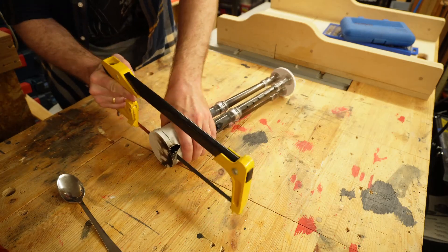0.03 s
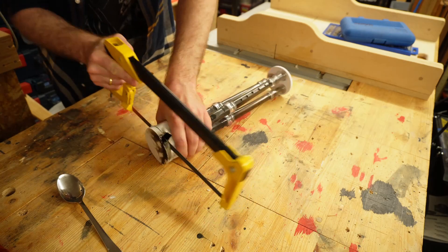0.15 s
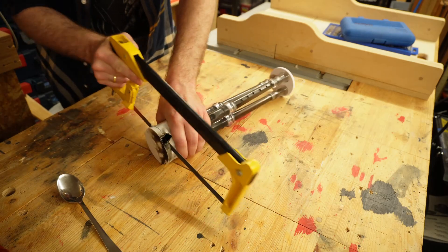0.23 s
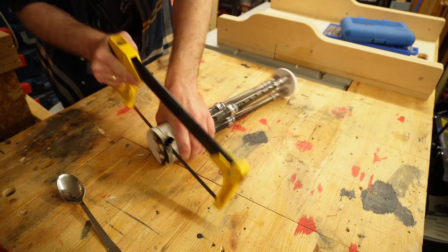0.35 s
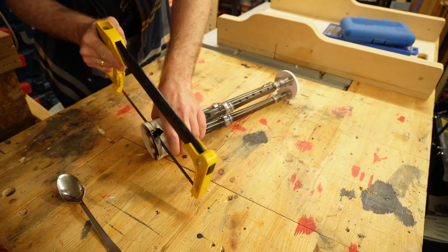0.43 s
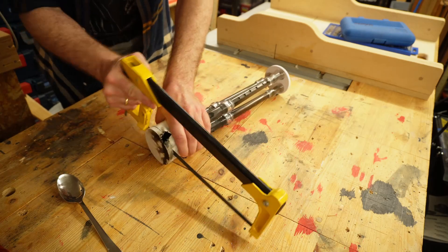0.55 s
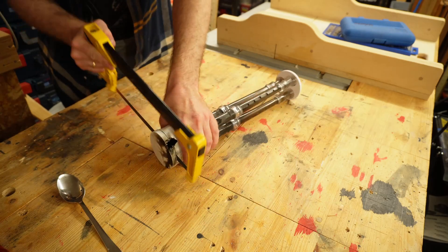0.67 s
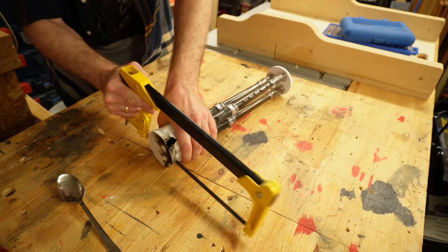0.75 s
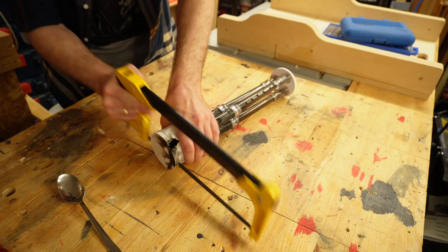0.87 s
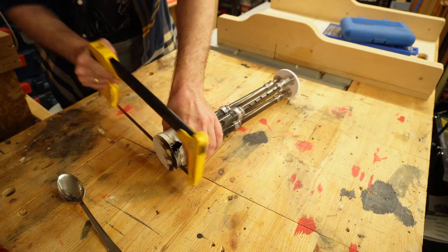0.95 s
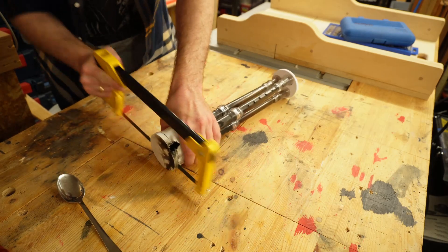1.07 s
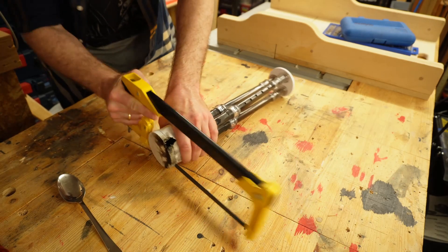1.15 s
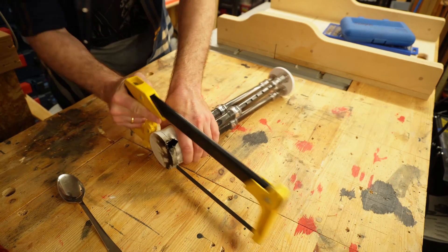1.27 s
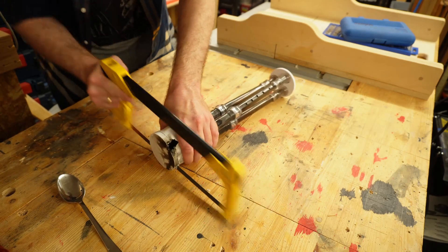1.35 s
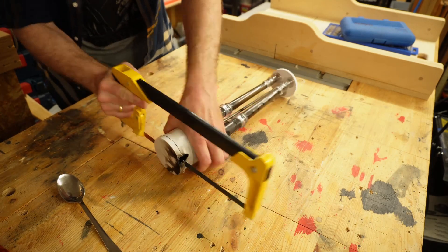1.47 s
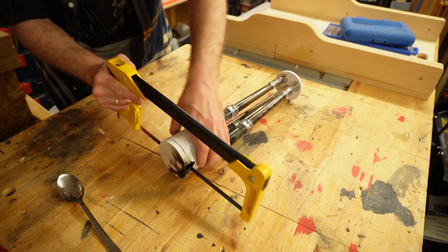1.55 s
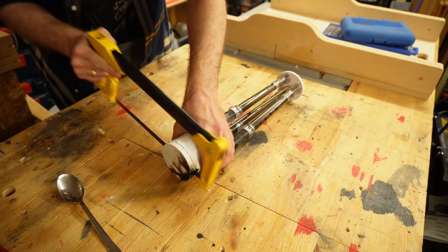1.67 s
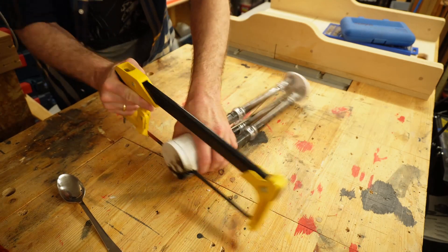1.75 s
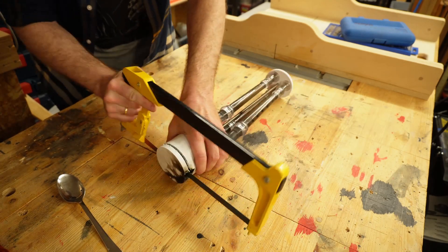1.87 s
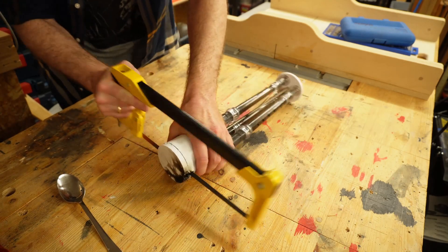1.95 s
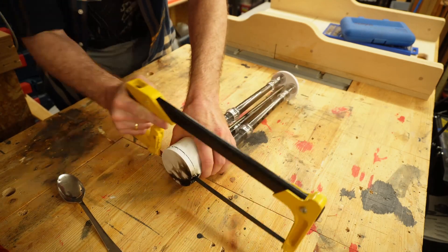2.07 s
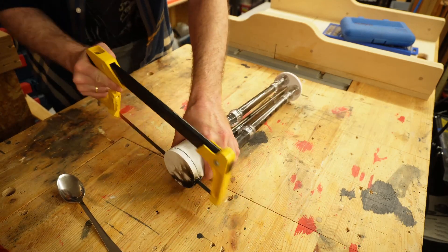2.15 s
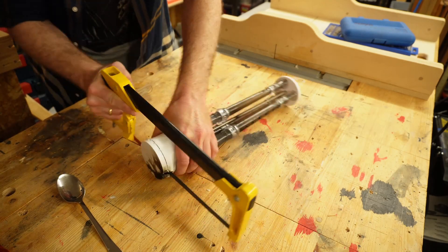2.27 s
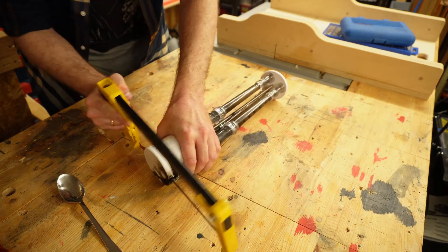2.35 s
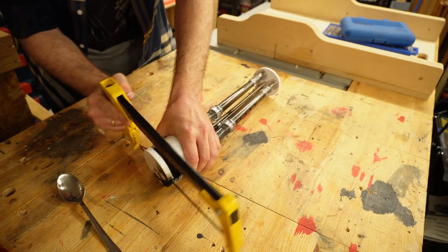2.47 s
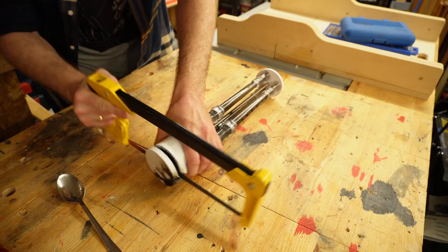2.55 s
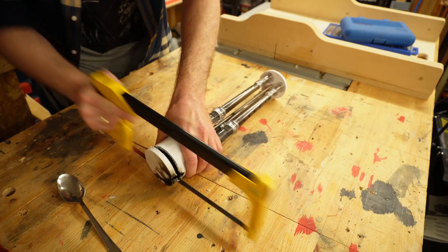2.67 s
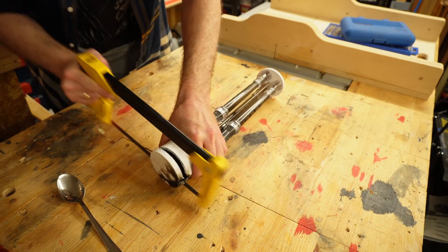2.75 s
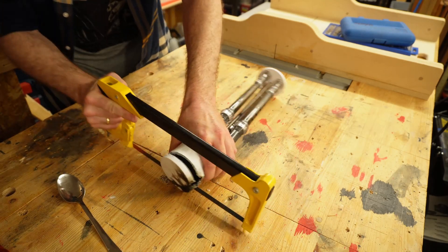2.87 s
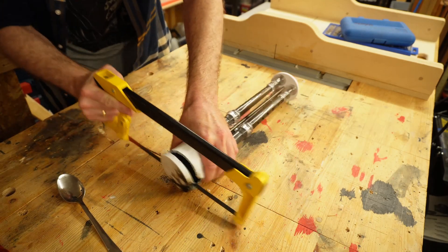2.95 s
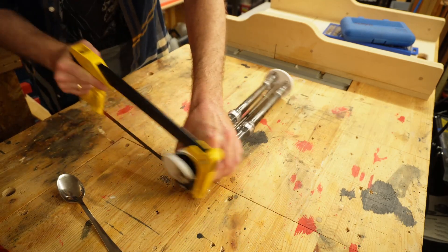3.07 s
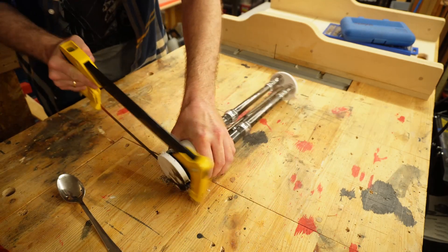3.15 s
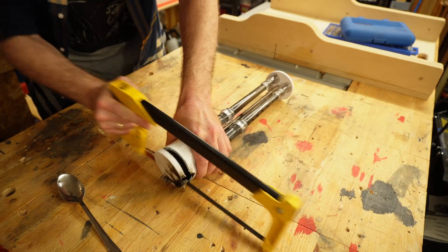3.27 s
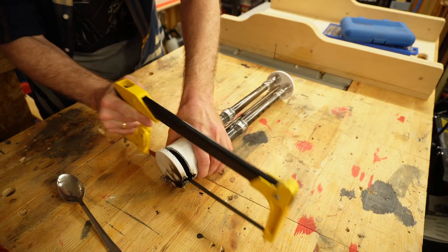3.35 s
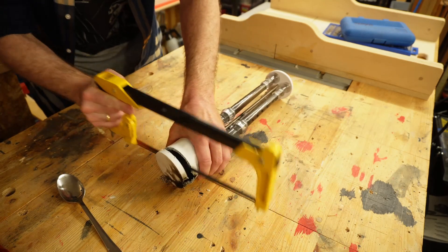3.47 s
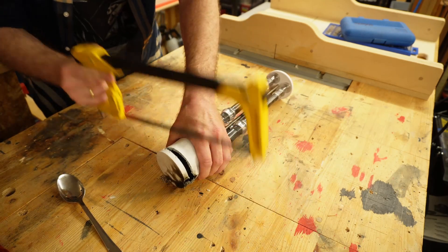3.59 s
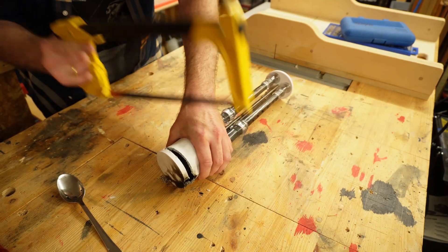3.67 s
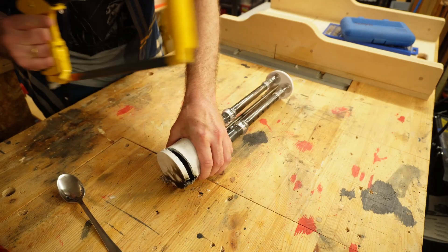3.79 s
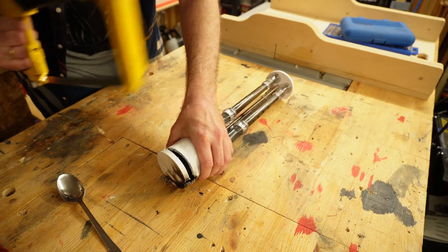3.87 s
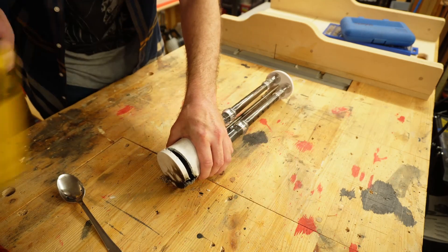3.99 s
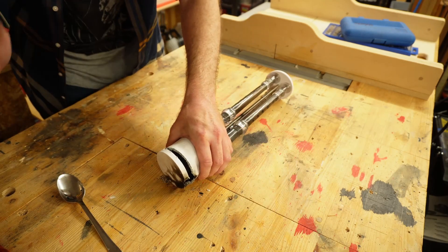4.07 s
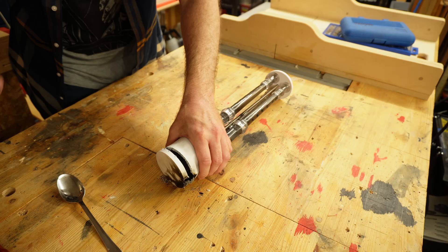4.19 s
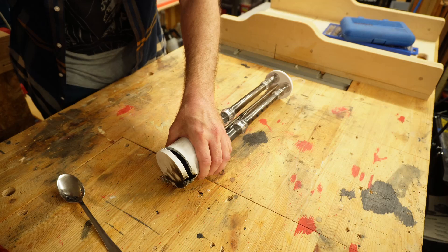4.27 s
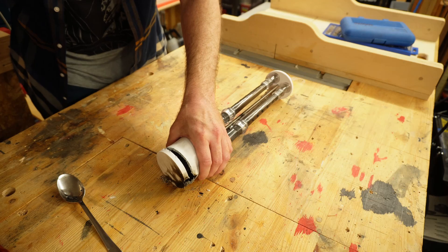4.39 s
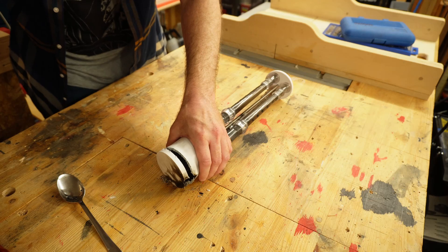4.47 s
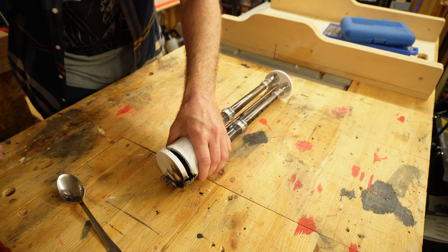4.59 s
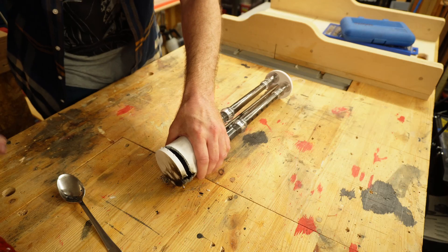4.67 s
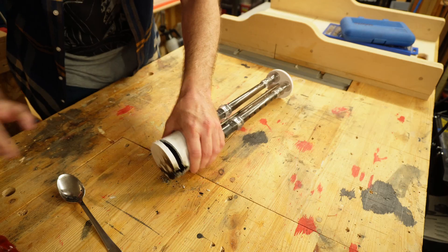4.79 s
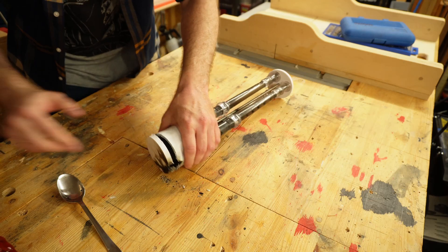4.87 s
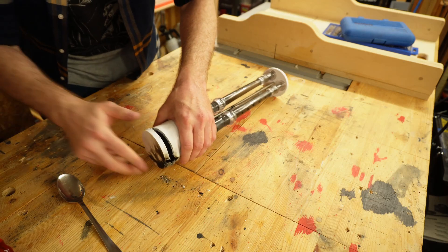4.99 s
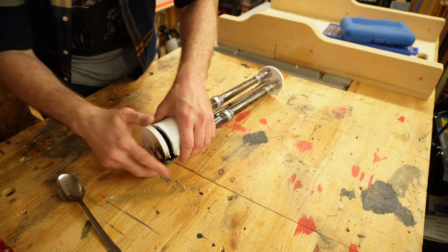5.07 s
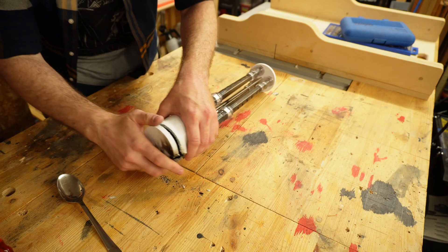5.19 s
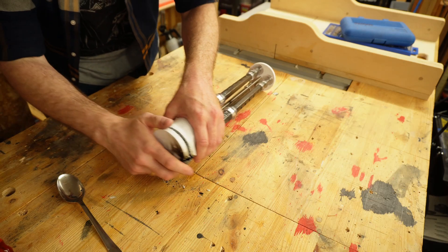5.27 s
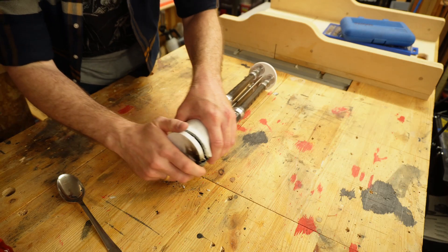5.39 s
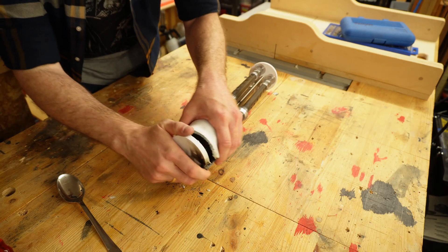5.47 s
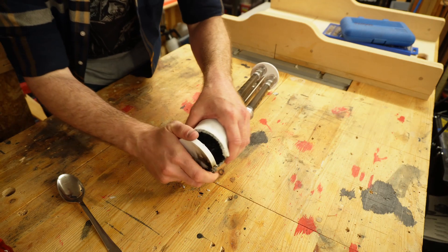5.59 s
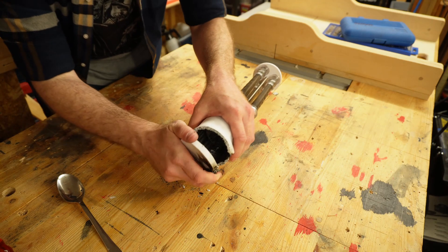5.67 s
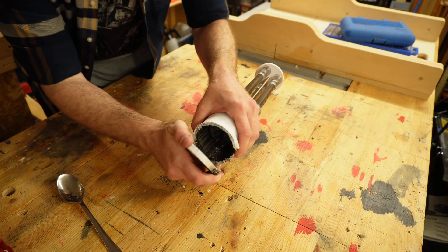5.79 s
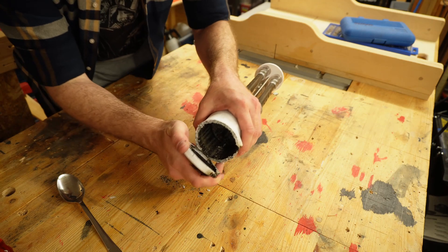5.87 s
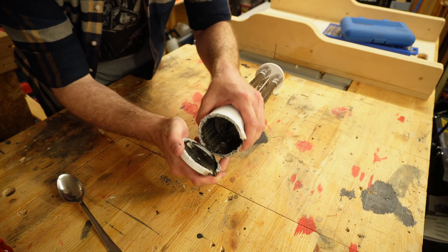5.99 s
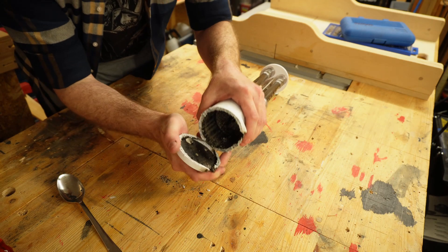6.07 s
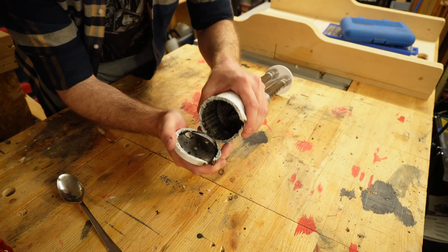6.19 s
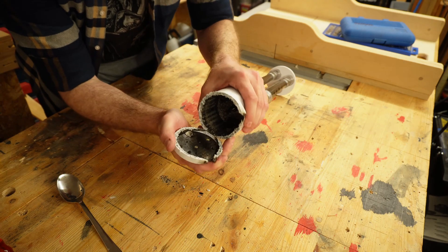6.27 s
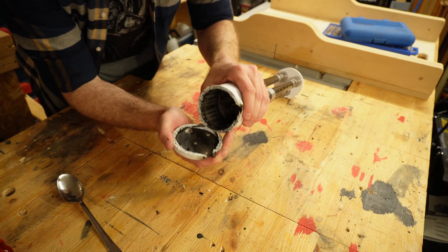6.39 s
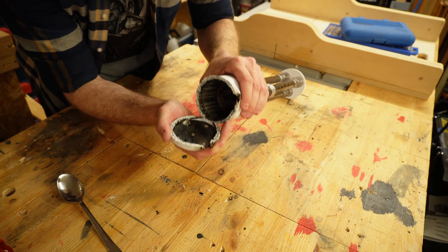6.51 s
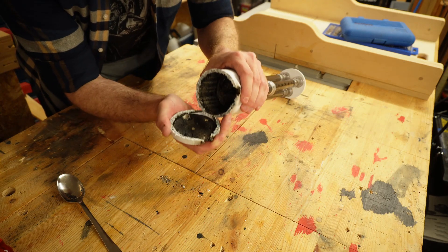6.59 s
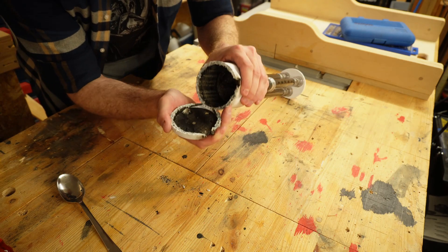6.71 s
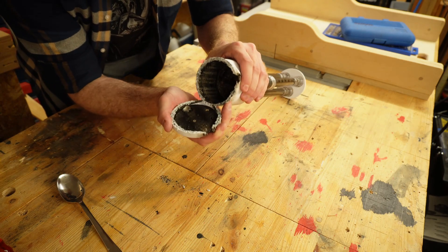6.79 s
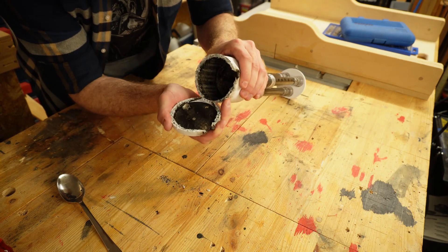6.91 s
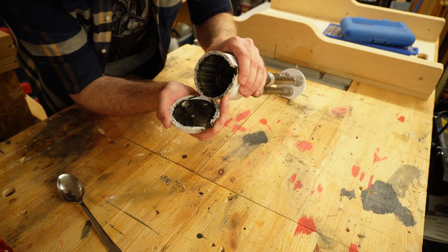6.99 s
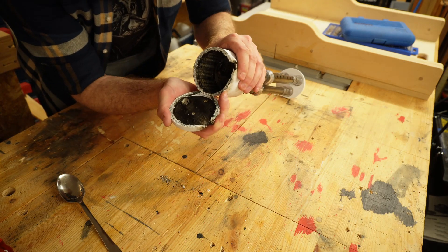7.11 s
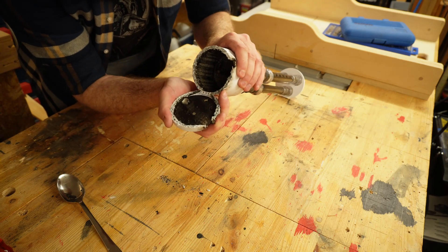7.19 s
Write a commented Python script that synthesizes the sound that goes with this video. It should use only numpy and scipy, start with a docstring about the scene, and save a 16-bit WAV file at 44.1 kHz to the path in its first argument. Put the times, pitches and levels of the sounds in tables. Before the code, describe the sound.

Speeded-up sawing of a hollow plastic tube at a wooden bench, a ringing saw set down with knocks, then hands rubbing and sharp plastic snaps.

```python
"""A hacksaw cuts a plastic pipe on a wooden workbench: a gliding tooth tone, chip noise and pipe resonances
follow the blade speed through fast halting strokes, rasping pulls and singing pushes, then slower last strokes.
The saw lifts off ringing as decaying sines and clatters onto the bench as contact noise in resonances.
Hands turn the pipe in coloured noise and bend the cut end open with four sharp snaps, which are short
bursts through resonances. Workshop air is steady coloured noise underneath."""
import sys
import numpy as np
from scipy import signal
from scipy.fft import rfft, irfft
from scipy.io import wavfile
from scipy.ndimage import uniform_filter1d

SR = 44100
rng = np.random.default_rng(int(sys.argv[2]) if len(sys.argv) > 2 else 0)


def transcribe(u):
    """Save the signal u as a 16-bit wav file named by the first command-line argument.

    u: samples, shape (n,) or (channels, n), limited to [-1, 1]; the rate is SR.
    q: integer samples, one column per channel.
    """
    v = np.clip(np.atleast_2d(u).T, -1, 1)
    q = np.round(v * 32767).astype(np.int16)
    wavfile.write(sys.argv[1], SR, q)


N = 319725
TIME = np.arange(N) / SR

# Levels of events, strokes and resonances are relative within their layer; the mix sets the final balance.


def from_db(db):
    """Decibels to gain."""
    return 10 ** (np.asarray(db) / 20)


def rms_one(x):
    """Scale to unit rms."""
    return x / np.sqrt(np.mean(x ** 2) + 1e-20)


def at_hz(points, hz):
    """Read a table on a log-frequency axis."""
    freqs, values = np.transpose(points)
    return np.interp(np.log(np.maximum(hz, 1)), np.log(freqs), values)


def colour(x, spectrum):
    """Give steady noise a spectrum; rms 1."""
    gain = from_db(at_hz(spectrum, np.fft.rfftfreq(N, 1 / SR)))
    return rms_one(irfft(rfft(x) * gain, N))


def drift(per_s):
    """Smooth chance that changes per_s times a second; spread 1."""
    return rms_one(np.interp(TIME * per_s, np.arange(N), rng.standard_normal(N)))


def grains(spread_db, per_s):
    """Noise that comes in clumps of uneven size; rms 1."""
    clumps = from_db(spread_db * np.clip(drift(per_s), -2.5, 2.5))
    return rms_one(rng.standard_normal(N) * clumps)


def patchy(x, spread_db, per_s):
    """Each band swells and fades a little on its own; rms 1."""
    edges = np.append(0, np.geomspace(1500, SR / 2, num=8))
    hz, spectrum = np.fft.rfftfreq(N, 1 / SR), rfft(x)
    out = np.zeros(N)
    for low, high in zip(edges, edges[1:]):
        band = irfft(spectrum * (hz >= low) * (hz < high), N)
        out += band * from_db(spread_db * drift(per_s).clip(-2, 2))
    return rms_one(out)


def swell(s, hold_s, attack_s, release_s):
    """An envelope that rises, holds and dies away."""
    rise = np.clip((TIME - s) / attack_s, 0, 1)
    return rise * np.exp(-np.clip((TIME - s - attack_s - hold_s) / release_s, 0, 20))


def resonate(x, modes):
    """Parallel resonances that together pass the power of white noise unchanged."""
    out, power = 0, 0
    for k, (hz, width, db) in enumerate(modes):
        r = np.exp(-np.pi * width / SR)
        gain = (1 - r * r) / 2
        poles = [1, -2 * r * np.cos(2 * np.pi * hz / SR), r * r]
        mode = signal.lfilter([gain, 0, -gain], poles, x + 1e-18)
        out = out + (-1) ** k * from_db(db) * mode  # neighbours in opposite polarity
        power += gain * from_db(db) ** 2
    return out / np.sqrt(power)


def contacts(rows, length_s):
    """Each blow is a burst of tiny contacts that dies away."""
    out = np.zeros(N)
    for s, db in rows:
        after = TIME[:N - int(s * SR)][:SR // 2]
        out[int(s * SR):][:len(after)] += from_db(db) * np.exp(-after / length_s)
    return out * rng.choice([-1, 1], N)


# workshop reverberation, scaled by the decay share of each layer: pitch_hz [Hz], t60_s [s]
WORKSHOP = [(120, .35), (400, 0.44), (1000, 0.27), (2500, 0.24314), (5500, 0.23), (9000, 0.21),
            (15000, 0.17)]


def room(x, wet_db, decay_share):
    """Direct sound plus dense reflections that die faster in the high treble."""
    t = TIME[:SR // 2]
    white = rfft(rng.standard_normal(len(t)))
    hz = np.fft.rfftfreq(len(t), 1 / SR)
    edges, tail = np.geomspace(80, SR / 2, num=12), 0
    for low, high in zip(edges, edges[1:]):
        t60 = decay_share * at_hz(WORKSHOP, np.sqrt(low * high))
        band = irfft(white * (hz >= low) * (hz < high), len(t))
        tail = tail + band * np.exp(-np.log(1000) * t / t60)
    tail = tail * (t > .0015)  # a short gap before the first reflection
    return x + from_db(wet_db) * signal.fftconvolve(x, tail / np.linalg.norm(tail))[:N]


# tone of the still air: pitch_hz [Hz], level_db [dB, relative]
AIR = [(12, -31.5), (20, 3), (81, -11.5), (167, -8.5), (291, -16), (354, -4), (442, -6.5), (636, -11),
       (3390, -20), (4480, -21), (15700, -31)]
AIR_DB = -54.5


def workshop_air():
    """Still air is steady noise with a fixed spectrum."""
    return from_db(AIR_DB) * colour(rng.standard_normal(N), AIR)


# dull bumps of the pipe on the bench: start_s [s], level_db [dB]
BUMPS = [(2.96, -11.5), (3.17, -12.5), (3.258, -3), (3.283, -6.5), (3.354, -4.5), (3.37, -20.5),
         (4.23, -32.5), (5.075, -30), (6.116, -27), (6.934, -26.5), (7.073, -33.5)]
# resonances of the wooden bench: pitch_hz [Hz], width_hz [Hz], level_db [dB]
BENCH = [(114, 14, -4), (162, 36, -3), (219.8, 62, -2), (282, 46, 0.5), (331.25, 39, 4.5), (445.1, 120, -3),
         (634.23, 87, -5), (917.6, 270, -10.5)]
BUMP_S = 0.009077  # decay time constant of a bump


def bench_bumps():
    """The pipe bumps on the bench and sets off its low resonances."""
    return resonate(contacts(BUMPS, BUMP_S), BENCH)


# hands shift on the pipe: start_s [s], hold_s [s], palm_db [dB], finger_db [dB]
RUBS = [(4.85, 0.0957, -49, -52.5), (4.988, 0.10664, -40.5, -45), (5.18, 0.04762, -44, -50),
        (5.617, 0.0688, -50.5, -54.5), (6.044, 0.09217, -54, -46.5), (6.314, 0.09973, -41, -49.5),
        (6.88, .05, -47.5, -77.5), (7.097, 0.0911, -44, -60.5)]
# tone of a palm rub: pitch_hz [Hz], level_db [dB, relative]
PALM = [(47, -54.5), (80, -36.5), (140, 2), (184, -12.5), (279, 2.5), (418, -7.5), (951, -13.5),
        (1200, -17), (1520, -14.5), (1800, -22.5), (2340, -48), (3960, -120)]
# tone of a finger rustle: pitch_hz [Hz], level_db [dB, relative]
FINGERS = [(880, -33), (1500, -11.5), (2000, -11), (3060, -7.5), (5300, -11), (7420, -22), (15000, -35)]
# resonances of the air in the tube: pitch_hz [Hz], width_hz [Hz], level_db [dB]
PIPE_CAVITY = [(259.4, 53, -5), (347, 60, -12.5), (493.45, 20, 6.5), (893.6, 110, -6.5), (1585, 200, -28)]
RUB_ATTACK_S, RUB_RELEASE_S = 0.03719, 0.08596
# both hands work at the cut end
GRIP_S, GRIP_HOLD_S, GRIP_PALM_DB, GRIP_FINGERS_DB = 5.55, 0.8662, -58.5, -64
# the tube hums more as its end is bent open
OPEN_S, OPENING_S, CAVITY_DB = 5.4198, 1, -53


def hands():
    """Palms rub the pipe dully, fingers rustle on its rough edge, and the opened tube hums."""
    palm, fingers = 0, 0
    grip = (GRIP_S, GRIP_HOLD_S, GRIP_PALM_DB, GRIP_FINGERS_DB)
    for s, hold_s, palm_db, finger_db in RUBS + [grip]:
        rub = swell(s, hold_s, RUB_ATTACK_S, RUB_RELEASE_S)
        palm = palm + from_db(palm_db) * rub
        fingers = fingers + from_db(finger_db) * rub
    opening = np.clip((TIME - OPEN_S) / OPENING_S, 0, 1)
    hum = from_db(CAVITY_DB) * opening * resonate(grains(2.7, 60), PIPE_CAVITY)
    palm_rub = palm * colour(grains(4.692, 53), PALM)
    finger_rustle = fingers * colour(grains(1.6, 300), FINGERS)
    return palm_rub + finger_rustle + hum


# bright snaps and ticks of the plastic, and bright pings as the saw is laid down:
# start_s [s], level_db [dB], pitch_hz [Hz, centre], hollow_db [dB, hollow ring], crack_db [dB, dry crack]
SNAPS = [(4.174, -20, 5620, -31.5, -22.5), (4.231, -30, 3900, 1.5, -20.5),
         (4.421, -17.5, 4500, -23.5, -24.5), (4.457, -21, 3998, -29.5, -18.5), (4.7, 5, 4059, -23, -21.5),
         (5.217, -28, 5030, -13, -3.5), (5.527, -33, 5040, -4.5, -5.5), (5.717, 7.5, 3941, -12.5, -8),
         (5.934, -35, 5100, 0.5, 0.5), (6.117, -11.5, 3305, 8.5, 3.5), (6.226, -34, 5649, -21, 6),
         (6.362, -4.5, 5407, -27.5, 0), (6.698, -26, 6500, -27, -12.5), (6.816, -25.5, 8913, -25.5, -11),
         (6.883, -39, 6000, 5.5, -11), (6.933, -37.5, 6004, -1, -9), (7.101, 5, 4884, -32, -30)]
# hollow resonances of the open pipe: pitch_hz [Hz], width_hz [Hz], level_db [dB]
OPEN_PIPE = [(1008.1, 450, 8.5), (1360, 280, -7), (2050, 280, 0)]


def snaps_and_pings(length_s, width_hz, splinter_db, break_db, top_hz=9500, low_hz=800):
    """A click and a fast spray of tiny clicks excite a bright resonance and a short hollow note."""
    cracks, hollow = np.zeros((2, N))
    t = TIME[:SR // 20]
    for s, db, hz, hollow_db, crack_db in SNAPS:
        splinters = from_db(splinter_db) * np.exp(-t / length_s) * rng.choice([-1, 1], len(t))
        burst = from_db(db) * (from_db(break_db) * (t == 0) + splinters)
        bright = resonate(burst, [(hz, width_hz, 0)])
        cracks[int(s * SR):][:len(t)] += bright + from_db(crack_db) * burst
        hollow[int(s * SR):][:len(t)] += from_db(hollow_db) * resonate(burst, OPEN_PIPE)
    cracks = signal.sosfilt(signal.butter(2, low_hz, "high", fs=SR, output="sos"), cracks)
    cracks = signal.sosfilt(signal.butter(1, top_hz, "low", fs=SR, output="sos"), cracks)
    return room(cracks, wet_db=-6.0, decay_share=1.0) + room(hollow, wet_db=-4.5, decay_share=0.7139)


# the saw frame strikes the pipe or the bench: start_s [s], level_db [dB]
KNOCKS = [(3.128, -1.5), (3.517, -12), (4.281, -30.5), (4.42, 3), (4.455, -0.5), (4.487, -13.5),
          (4.554, -13.5), (4.581, -14), (4.671, -11.5), (4.699, 2.5)]
# the saw rattles as it leaves the cut, as one end lands, as it tips over and as it falls flat:
# start_s [s], hold_s [s], level_db [dB]
RATTLES = [(3.505, 0.075, -29), (4.421, 0.04824, -17.5), (4.57, 0.2, -30.5), (4.704, 0.062214, -7)]
# resonances of the saw against the bench: pitch_hz [Hz], width_hz [Hz], level_db [dB]
SAW_ON_BENCH = [(157.27, 72, -8.5), (330, 130, -7.5), (560.17, 110, -2.5), (637.2, 32.755, 7.5),
                (734.9, 85, -3), (880.2, 68.62, 4.5), (1061.9, 87, 2.5), (1436, 390.36, -4.5),
                (1802.9, 285.25, -1.5), (2852, 485.6, -14), (4436, 892.9, -18)]
KNOCK_S = 0.0033275  # decay time constant of a knock
RATTLE_ATTACK_S, RATTLE_RELEASE_S = 0.007568, 0.03125


def saw_laid_down():
    """The frame knocks and chatters, in short contact bursts and clumped noise through resonances."""
    rattle = np.zeros(N)
    for s, hold_s, db in RATTLES:
        rattle += from_db(db) * swell(s, hold_s, RATTLE_ATTACK_S, RATTLE_RELEASE_S)
    return resonate(contacts(KNOCKS, KNOCK_S) + rattle * grains(2.6745, 400), SAW_ON_BENCH)


# ringing of saw frame and blade: pitch_hz [Hz], t60_s [s], lift_db [dB, leaving the cut], land_db [dB, landing]
FRAME = [(371.21, 2.8, -42, -59.5), (639.32, 1.536, -71, -33), (1263.5, 1.9787, -38.5, -50),
         (1447, 0.9504, -72.5, -26.5), (1812.6, 0.72, -41.5, -34), (1868, .6, -59.5, -56.5),
         (2427.8, 0.39, -69.5, -30.5), (2614.3, 0.4, -38.5, -51.5), (3370, 0.88, -53, -64.5),
         (4331.5, 0.64, -47, -34.5), (5838, 0.56, -62, -44), (7392.4, 0.2465, -67, -29.5)]
LIFT_S, LAND_S = 3.61, 4.755


def frame_ring():
    """The tensioned frame rings in decaying sines when it slips out of the cut and when it lands."""
    out = np.zeros(N)
    for hz, t60, lift_db, land_db in FRAME:
        for s, db in ((LIFT_S, lift_db), (LAND_S, land_db)):
            t = TIME[:N - int(s * SR)]
            decay = np.exp(-np.log(1000) * t / t60)
            out[int(s * SR):] += from_db(db) * decay * np.sin(2 * np.pi * hz * t)
    return out


STROKE_SKEW = .87  # under 1: the blade speeds up faster than it slows down


def blade(strokes, flatness=1.25, bite=0.6847):
    """The blade speeds up, runs evenly and stops in each stroke; tooth rate and three levels follow."""
    rate, gains = np.zeros(N), np.zeros((3, N))
    for start, end, top_hz, *levels_db in strokes:
        span = slice(max(int(start * SR), 0), int(end * SR))
        progress = np.linspace(0, 1, len(TIME[span])) ** STROKE_SKEW
        swing = np.sin(np.pi * progress).clip(0)
        speed = np.tanh(flatness * swing) / np.tanh(flatness)
        rate[span] = np.maximum(rate[span], top_hz * speed)
        gains[:, span] += from_db(levels_db)[:, None] * swing ** bite
    return rate, gains


# resonances of the pipe in the cut: pitch_hz [Hz], width_hz [Hz], level_db [dB]
CUT_PIPE = [(450, 58, -8), (650, 120, -9.5), (870.73, 110, -1), (1080, 59, -0.5), (1336, 150, -4.5),
            (1701.9, 220, -3.5), (1948.5, 110, 3), (2700, 550, -9)]
TOOTH_TOP_HZ = 6500  # blade and pipe pass the overtones of the teeth up to here


def sawing(strokes, chip_spectrum, chips_db, body_db, tone_db, jitter, grain_db, overtone_db):
    """Teeth hit the wall one after another: a gliding tone, a spray of chips and the shaken pipe."""
    rate, (hiss, body, tone) = blade(strokes)
    # the blade sticks and frees itself, so its speed and its bite waver
    unsteady = 1 + jitter * drift(1500) + 0.040091 * drift(150)
    phase = 2 * np.pi * np.cumsum(rate * unsteady) / SR
    teeth = np.zeros(N)
    for k in np.arange(4) + 1:
        gain = from_db(overtone_db * np.log2(k) + 3.5 * drift(220).clip(-2, 1.5))
        teeth += gain * np.sin(k * phase) * (k * rate < SR / 2)
    teeth = rms_one(teeth * from_db(2.4 * drift(1100)))
    teeth = signal.sosfilt(signal.butter(2, TOOTH_TOP_HZ, fs=SR, output="sos"), teeth)
    # each tooth tears off a chip as it passes
    spray = grains(grain_db, 900) * (1 + 0.41 * np.cos(phase))
    chips = patchy(colour(spray, chip_spectrum), spread_db=4.0, per_s=90)
    pipe = resonate(body * grains(grain_db, 400), CUT_PIPE)
    return from_db(chips_db) * hiss * chips + from_db(body_db) * pipe + from_db(tone_db) * tone * teeth


# slower last strokes: start_s [s], end_s [s], level_db [dB]
SLOW_STROKES = [(2.862, 2.955, -34), (2.94, 3.05, -39), (3.03, 3.125, -25.5), (3.123, 3.2, -31),
                (3.19, 3.275, -36), (3.255, 3.355, -15), (3.401, 3.505, -44.5), (3.504, 3.64, -39.5)]
# top tooth rate at 0 dB level; drop in level that halves it
SLOW_HZ, SLOW_DB_PER_OCTAVE = 2096, 30
SLOW_BODY_DB, SLOW_TONE_DB = 8, 3  # against the chip hiss, before the layer balance


def slow_strokes():
    """The level of a slow stroke sets its tooth rate and all three of its part levels."""
    strokes = []
    for start, end, db in SLOW_STROKES:
        top_hz = SLOW_HZ * 2 ** (db / SLOW_DB_PER_OCTAVE)
        strokes.append((start, end, top_hz, db, db + SLOW_BODY_DB, db + SLOW_TONE_DB))
    return strokes


# tone of the chip spray in the slow strokes: pitch_hz [Hz], level_db [dB, relative]
SLOW_CHIPS = [(100, -24), (1500, 6), (2600, 0.5), (3500, 5.5), (4500, 8), (6000, 0), (8500, -2.5),
              (12000, -10), (16000, -20.5)]


def slow_sawing():
    """Duller, slower last strokes that also set the bench rumbling."""
    strokes = sawing(slow_strokes(), SLOW_CHIPS, chips_db=5.5, body_db=-9.0, tone_db=-7.0,
                     jitter=0.12416, grain_db=2.5, overtone_db=-12.0)
    _, (_, body, _) = blade(slow_strokes())
    return strokes + from_db(-7.0) * resonate(body * grains(8.0, 150), BENCH)


# short gliding squeaks of the blade, and a short ping as the saw is laid down:
# start_s [s], length_s [s], first_hz [Hz], last_hz [Hz], level_db [dB]
GLIDES = [(0.393, 0.02138, 11990, 8121, -7.5), (0.64, 0.01718, 1992, 2050, -7),
          (1.939, 0.01992, 1987, 1887, -11), (3.306, 0.0231, 2865, 2614, -9.5),
          (3.328, 0.01434, 1421, 1347, -4.5), (4.643, 0.018, 2384, 2318, -31.5)]


def squeaks_and_ping():
    """Short sine glides, falling or rising under a smooth swell."""
    out = np.zeros(N)
    for s, length, first_hz, last_hz, db in GLIDES:
        hz = np.linspace(first_hz, last_hz, int(length * SR))
        note = np.sin(2 * np.pi * np.cumsum(hz) / SR)
        out[int(s * SR):][:len(hz)] += from_db(db) * np.sqrt(2) * np.hanning(len(hz)) * note
    return out


# free-running cycles, a rasping pull and then a singing push: start_s [s, of the push], pull_s [s, length],
# push_s [s, length], push_hz [Hz, top tooth rate], sing_db [dB], body_db [dB, pipe body in the push]
CYCLES = [(.739, 0.084281, .051, 4155, 0.5, -8), (.879, 0.071, 0.053195, 3957, -0.5, -14),
          (1.015, .052, .05, 4917, 5.5, -20), (1.134, 0.049101, .053, 4000, 0, -13.5),
          (1.259, .05, 0.051138, 4150, 2, -22.5), (1.378, 0.052193, .051, 3350, 2, -17),
          (1.728, .062, .052, 3400, -3.5, -10.5), (2.071, 0.09041, .056, 4700, -1, -21),
          (2.203, .055, .047, 3500, -1, -25), (2.678, .112, .05, 4159, 1.5, -14.5),
          (2.835, .08, 0.038834, 3240, 5.5, -11.5)]
# halting strokes, while the cut is started or the blade jams:
# start_s [s], end_s [s], chips_db [dB, hiss], body_db [dB, pipe body]
HALTING_STROKES = [(0, .025, -56, -27), (0.069, .115, -40.5, -29.5), (.146, .186, -25.5, -19.5),
                   (.186, .232, -40, -29), (.279, .313, -22, -9.5), (.374, 0.425, -23.5, -14),
                   (.492, 0.577, -15, -7.5), (.629, .678, -14, -10), (1.463, 1.556, -25.5, -20),
                   (1.6, 1.66, -34.5, -25), (1.811, 1.83, -25, -16.5), (1.857, 1.899, -23, -18.5),
                   (2.267, 2.284, -14, -18), (2.288, 2.365, -33.5, -26.5), (2.365, 2.419, -11.5, -29),
                   (2.44, 2.469, -12, -29)]
HALTING_HZ, HALTING_TONE_DB = 1850, -5.5  # top tooth rate; tooth tone against the pipe body
TURN_S = .007  # the saw rests between pull and push
PUSH_CHIPS_DB, PUSH_TONE_DB = -10, -5.5  # a push that sings more hisses less
PULL_TEETH = 150  # a pull always covers the same length of blade, so a longer one is slower
PULL_HZ, PULL_CHIPS_DB, PULL_TONE_DB, PULL_BODY_DB = 3000, -11.5, -12.5, -17  # a brisk pull
PULL_DB_PER_OCTAVE = 9.5  # chips and tone grow with the speed


def quick_strokes():
    """Pulls, pushes and halting strokes: start_s, end_s, top_hz (tooth rate), chips_db, body_db, tone_db."""
    strokes = []
    for start, end, chips_db, body_db in HALTING_STROKES:
        strokes.append((start, end, HALTING_HZ, chips_db, body_db, body_db + HALTING_TONE_DB))
    for s, pull_s, push_s, push_hz, sing_db, body_db in CYCLES:
        pull_hz = PULL_TEETH / pull_s
        speed_db = PULL_DB_PER_OCTAVE * np.log2(pull_hz / PULL_HZ)
        pull_end = s - TURN_S
        strokes.append((pull_end - pull_s, pull_end, pull_hz,
                        PULL_CHIPS_DB + speed_db, PULL_BODY_DB, PULL_TONE_DB + speed_db))
        strokes.append((s, s + push_s, push_hz, PUSH_CHIPS_DB - sing_db, body_db, PUSH_TONE_DB + sing_db))
    return strokes


# tone of the quick chip spray: pitch_hz [Hz], level_db [dB, relative]
QUICK_CHIPS = [(60, -15.5), (220, -31), (500, -15), (1500, -11.5), (2800, -3.5), (4200, 3), (6300, 4.5),
               (8500, -0.5), (11500, 3), (13500, 5), (16000, -5)]
# teeth snag on the edge of the cut: start_s [s], level_db [dB]
SNAGS = [(.291, -8.5), (.381, -2.5), (.707, -11), (.807, -2.5), (1.823, -6.5), (1.861, -19), (1.878, -4.5),
         (1.942, -0.5), (2.012, 2), (2.267, -4), (2.369, 2.5), (2.378, -5), (2.442, -5.5), (2.558, -11),
         (2.607, -32), (2.657, -6), (2.75, -2)]
# the pipe rocks as a quick stroke turns round: start_s [s], level_db [dB]
ROCKS = [(.358, -13), (.571, -4), (.624, -15.5), (.822, -13), (1.182, -3.5), (1.305, -3.5), (2.05, -15.5)]
# resonances of the rocking pipe: pitch_hz [Hz], width_hz [Hz], level_db [dB]
ROCKING_PIPE = [(444, 88, 1), (660, 97, 1.5), (870, 88, 3.8), (1120, 130, 2)]
SNAG_S, ROCK_S = 0.0026, 0.0056  # decay time constants of the blows
# around the strokes the blade drags lightly on the walls of the cut
DRAG_DB, DRAG_SPREAD_S = -14.5, 0.055
# the song of the teeth: level, unsteadiness, dB per octave of overtones
QUICK_TONE_DB, QUICK_JITTER, QUICK_OVERTONE_DB = -1.7, .042, -5


def quick_sawing():
    """Fast, bright strokes as if played at two to three times speed, with a short room and thin bass."""
    strokes = sawing(quick_strokes(), QUICK_CHIPS, chips_db=-1.0, body_db=-3.0, tone_db=QUICK_TONE_DB,
                     jitter=QUICK_JITTER, grain_db=6.0, overtone_db=QUICK_OVERTONE_DB)
    _, (_, body, _) = blade(quick_strokes())
    bites = contacts(SNAGS, SNAG_S)
    drag = from_db(DRAG_DB) * uniform_filter1d(body, int(DRAG_SPREAD_S * SR)) * grains(3.0, 300)
    dry_snags = from_db(-7.5) * (bites + from_db(6) * drag)
    pipe_snags = resonate(from_db(-6) * bites + from_db(-1) * drag, CUT_PIPE)
    rocking = resonate(contacts(ROCKS, ROCK_S), ROCKING_PIPE)
    mix = strokes + dry_snags + pipe_snags + squeaks_and_ping() + rocking
    in_room = room(mix, wet_db=-4.5, decay_share=0.4)
    return signal.sosfilt(signal.butter(2, 370, "high", fs=SR, output="sos"), in_room)


def scene():
    """Sawing, the saw laid down, the cut end bent open, over the still air of the workshop."""
    bench = bench_bumps() + saw_laid_down()
    work = room(slow_sawing() + bench, wet_db=-6.0, decay_share=0.9982)
    cracks = snaps_and_pings(length_s=0.0009432, width_hz=1295.6, splinter_db=-2, break_db=9.5)
    return (quick_sawing() + work + cracks + frame_ring() + hands() + workshop_air())[None]


CUTOFF_HZ = 15900


def record(dry):
    """The loudest peaks overload; the top is cut."""
    clipped = np.clip(dry, -.95, .95)
    return signal.sosfilt(signal.ellip(12, .2, 70, CUTOFF_HZ, fs=SR, output="sos"), clipped)


dry = scene()
out = record(dry)
transcribe(out)
```